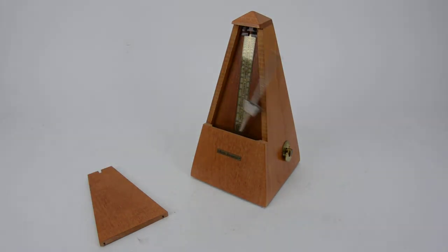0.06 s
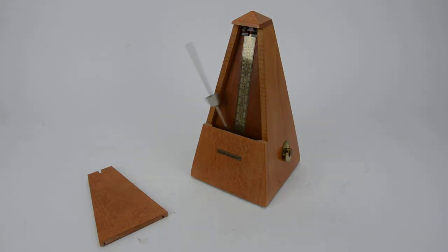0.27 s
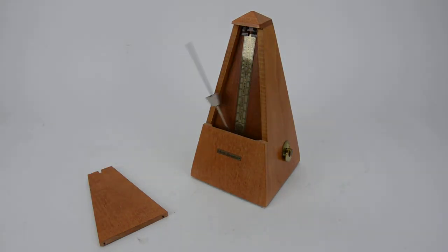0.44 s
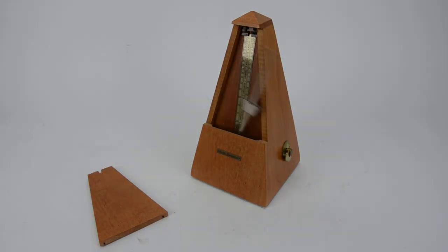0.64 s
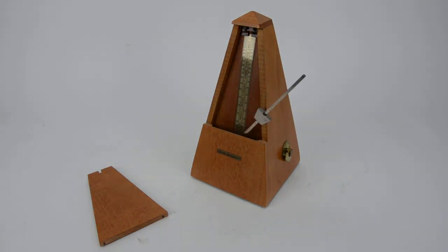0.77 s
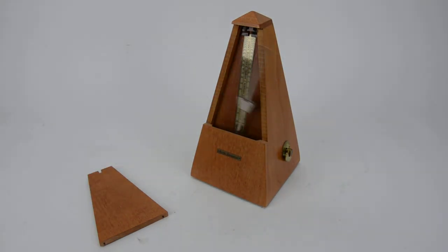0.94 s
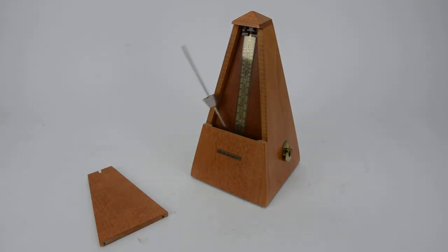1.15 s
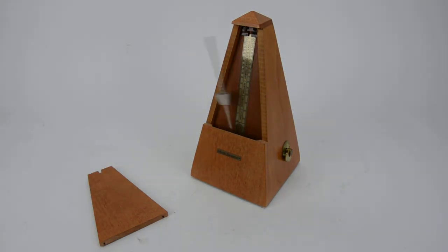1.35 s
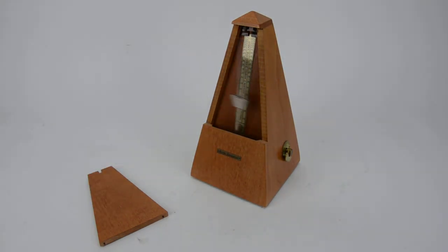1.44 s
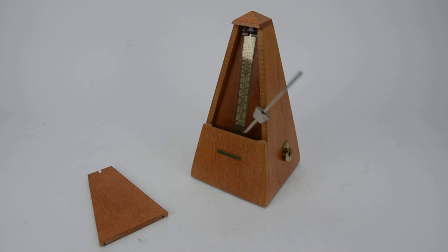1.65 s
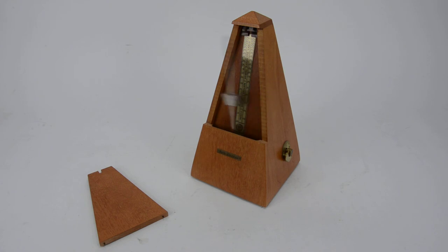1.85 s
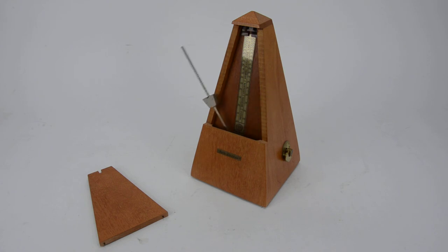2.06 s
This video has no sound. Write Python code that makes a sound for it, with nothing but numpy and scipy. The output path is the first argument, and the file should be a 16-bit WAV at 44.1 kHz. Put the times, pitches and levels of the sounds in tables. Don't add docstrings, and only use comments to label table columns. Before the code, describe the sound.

Five sharp, woody metronome ticks, each preceded by a tiny click, over faint room hiss.

```python
import sys
import numpy as np
from scipy import signal
from scipy.io import wavfile

SR = 44100
rng = np.random.default_rng(int(sys.argv[2]) if len(sys.argv) > 2 else 0)


def makeup_ratio(level_db):
    decades = np.asarray(level_db, float) / 20
    return 10 ** decades


def master_out(mix):
    frames = np.transpose(np.atleast_2d(mix))
    ceiling = np.clip(frames, -1, 1)
    pcm = np.round(ceiling * 32767).astype(np.int16)
    wavfile.write(sys.argv[1], SR, pcm)


N = 92610
RING = SR // 10
PAD = SR // 4

# (frequency [Hz], level [dB])
HISS_SPECTRUM = [(25, -30.5), (60, -15.5), (300, -1.5), (700, -4.5), (2500, -10), (5000, -17),
                 (9000, -38.5), (13000, -46.5)]
HISS_DB = -53
HUM_HZ, HUM_DB = 119.3, -64
WHISTLE_HZ, WHISTLE_DB = 15690, -78

# (frequency [Hz], decay by 60 dB [s])
ROOM_T60 = [(200, .5), (700, 0.4054), (1500, 0.4075), (3500, 0.29), (7000, 0.4286), (14000, 0.22)]
# (frequency [Hz], level [dB])
ROOM_COLOUR = [(300, 10.5), (720, 1.5), (1500, -1.7), (3200, -4), (5000, -0.1), (8300, 2), (10500, 6),
               (13500, -5.5)]
ROOM_DB, TAIL_TOP_HZ = -40, 14300
FIRST_WALL_S, ROOM_BUILD_S = 0.004, 0.0049
EARLY_DB, EARLY_T60_S = -0.5, 0.053

# (time [s], peak level [dB], level of squeak before it [dB], centre of click [Hz])
SLIPS = [
    (0.1418, -47, -58, 2580),
    (0.589, -46, -72.5, 4050),
    (0.9848, -40, -65, 2750),
    (1.435, -39.5, -61, 3450),
    (1.8322, -47, -60, 3450),
]
SLIP_DB, SLIP_BOUNCE_S, SLIP_BOUNCE_DB = -2, 0.00075, -1
SLIP_FOCUS_DB = 6.5
SQUEAK_RISE_S, SQUEAK_FALL_S, SQUEAK_LEAD_S = 0.024, 0.021, 0.0048

# (time [s], peak level [dB])
TICKS = [
    (0.20365, 4.5),
    (0.63933, 3.5),
    (1.04631, 4.5),
    (1.48238, 3.5),
    (1.88945, 5),
]
EARLIER_TICK_S, EARLIER_TICK_DB = -0.205, 4
STRIKE_SPREAD_DB = 1.5

# (frequency [Hz], level [dB], decay by 60 dB [s])
CASE = [(632.8, -12.5, 0.049), (684, -3.25, 0.039), (741.6, -6.5, 0.03), (890, -8, 0.01),
        (1146, -12.5, 0.029), (1482, -11, 0.021), (1751, -7.5, 0.02)]
# (frequency [Hz], level [dB], decay by 60 dB [s])
PLATE = [(2583, -7.5, 0.027), (2894, -5.5, 0.0077), (3091, -3.5, 0.013), (3250, 1, 0.015),
         (3414, 3, 0.0092), (3790, -5, 0.015), (4095, -13.5, 0.029), (4471, -4, 0.02), (5007, -13.5, 0.035),
         (5149, -4.5, 0.0077), (6515, -16, 0.036), (7080, -23, .008), (9920, -15.5, 0.0058),
         (13800, -18.5, .003)]
CASE_SWELL_S, PLATE_SWELL_S, BODY_LOW_CUT_HZ = 0.0027, 0.0001, 640
ROD_HZ, ROD_DB, ROD_T60_S = 8863, -67, 0.89

# (frequency [Hz], level [dB])
RATTLE = [(1000, -14), (2200, -17.5), (3300, -10), (5000, -6.5), (6300, -3.5), (9500, -1), (12000, -17),
          (15500, -35)]
RATTLE_DB, RATTLE_T60_S = -11, 0.04

AROUND_DB, AROUND_BLUR = 4, 3.5
CASE_AROUND_DB, CASE_AROUND_BLUR = 1, 1.18

MIC_NOTCH_HZ, MIC_NOTCH_WIDTH_HZ, MIC_NOTCH_DB = 5730, 450, -15
OVERDRIVE_DB, CLIP_HARDNESS = -3.5, 7.0


def at_hz(points, hz):
    point_hz, value = np.array(points).T
    return np.interp(np.log(hz), np.log(point_hz), value)


def bands(size):
    edges = 28 * 2 ** np.arange(0, 9.4, 1 / 3)
    white = rng.standard_normal((2, size + RING))
    out = []
    for k, (low, high) in enumerate(zip(edges, edges[1:])):
        sos = signal.butter(2, [low, high], "band", fs=SR, output="sos")
        noise = signal.sosfilt(sos, white[k % 2])[RING:]
        out.append((np.sqrt(low * high), noise))
    return out


def place(sounds, times):
    out = np.zeros(N + PAD + sounds.shape[1])
    starts = (times * SR).astype(int) + PAD
    for sound, start in zip(sounds, starts):
        out[start:start + len(sound)] += sound
    return out[:N + PAD]


def strike(modes, db, swell_s, size=RING, damped=1, centre_hz=None):
    hz, level_db, t60 = np.transpose(modes)[:, :, None]
    t = np.arange(size) / SR
    decay = makeup_ratio(level_db - 60 * damped * t / t60)
    swell = 1 - np.exp(-t / swell_s)
    rings = decay * np.sin(2 * np.pi * hz * t) * swell
    off_db = 0
    if centre_hz is not None:
        off_db = SLIP_FOCUS_DB * np.abs(np.log2(hz.T / centre_hz[:, None]))
    spread_db = STRIKE_SPREAD_DB * rng.standard_normal((len(db), len(modes)))
    return makeup_ratio(db[:, None] - off_db + spread_db) @ rings


def floor():
    t = np.arange(N) / SR
    hiss = sum(makeup_ratio(at_hz(HISS_SPECTRUM, hz)) * noise for hz, noise in bands(N))
    hum = makeup_ratio(HUM_DB) * np.sin(2 * np.pi * HUM_HZ * t)
    whistle = makeup_ratio(WHISTLE_DB) * np.sin(2 * np.pi * WHISTLE_HZ * t)
    return makeup_ratio(HISS_DB) * hiss / hiss.std() + hum + whistle


def room(sound):
    t = np.arange(SR // 2) / SR
    tail = 0
    for hz, noise in bands(len(t)):
        tail = tail + makeup_ratio(at_hz(ROOM_COLOUR, hz) - 60 * t / at_hz(ROOM_T60, hz)) * noise
    early = 1 + makeup_ratio(EARLY_DB - 60 * t / EARLY_T60_S)
    build = 1 - np.exp(-np.maximum(t - FIRST_WALL_S, 0) / ROOM_BUILD_S)
    top_cut = signal.cheby1(10, 1, TAIL_TOP_HZ, fs=SR, output="sos")
    tail = signal.sosfilt(top_cut, tail * early * build)
    return makeup_ratio(ROOM_DB) * signal.fftconvolve(sound, tail)[:len(sound)]


def slips():
    s, db, squeak_db, hz = np.transpose(SLIPS)
    click_db = np.r_[db, db + SLIP_BOUNCE_DB] + SLIP_DB
    clicks = strike(PLATE, click_db, PLATE_SWELL_S, centre_hz=np.r_[hz, hz])
    click = place(clicks, np.r_[s, s + SLIP_BOUNCE_S])
    t = (np.arange(N + PAD) - PAD) / SR
    late = t - (s[:, None] - SQUEAK_LEAD_S)
    envelope = np.exp(np.where(late < 0, late / SQUEAK_RISE_S, -late / SQUEAK_FALL_S))
    squeak = makeup_ratio(squeak_db) @ envelope * np.sin(2 * np.pi * ROD_HZ * t)
    return click, squeak


def ticks():
    s, db = np.transpose([(EARLIER_TICK_S, EARLIER_TICK_DB)] + list(TICKS))
    t = np.arange(RING) / SR
    fade = makeup_ratio(db[:, None] + RATTLE_DB - 60 * t / RATTLE_T60_S)
    rattle = fade * sum(makeup_ratio(at_hz(RATTLE, hz)) * noise for hz, noise in bands(RING))
    case = strike(CASE, db, CASE_SWELL_S)
    plate = strike(PLATE, db, PLATE_SWELL_S)
    direct = case - plate + rattle

    case_around = strike(CASE, db, CASE_SWELL_S, damped=CASE_AROUND_BLUR)
    plate_around = strike(PLATE, db, PLATE_SWELL_S, damped=AROUND_BLUR)
    rattle_around = rattle * makeup_ratio(-60 * AROUND_BLUR * t / RATTLE_T60_S)
    around = makeup_ratio(CASE_AROUND_DB) * case_around + makeup_ratio(AROUND_DB) * (rattle_around - plate_around)

    rod = strike([(ROD_HZ, ROD_DB, ROD_T60_S)], db, PLATE_SWELL_S, size=SR // 2)
    knock = makeup_ratio(OVERDRIVE_DB) * np.array([place(direct, s), place(around, s)])
    return knock, place(rod, s)


def scene():
    knock, rod = ticks()
    click, squeak = slips()
    low_cut = signal.butter(4, BODY_LOW_CUT_HZ, "high", fs=SR, output="sos")
    direct, around = signal.sosfilt(low_cut, knock + click)
    metronome = direct + room(around) + rod + squeak
    return (metronome[PAD:] + floor())[None]


def band_limit(x):
    return signal.sosfilt(signal.butter(12, 16480, fs=SR, output="sos"), x)


def record(dry):
    peak = signal.iirpeak(MIC_NOTCH_HZ, MIC_NOTCH_HZ / MIC_NOTCH_WIDTH_HZ, fs=SR)
    band = signal.lfilter(*peak, dry)
    heard = dry - (1 - makeup_ratio(MIC_NOTCH_DB)) * band
    clipped = heard / (1 + np.abs(heard) ** CLIP_HARDNESS) ** (1 / CLIP_HARDNESS)
    return band_limit(clipped)


dry = scene()
out = record(dry)
master_out(out)
```